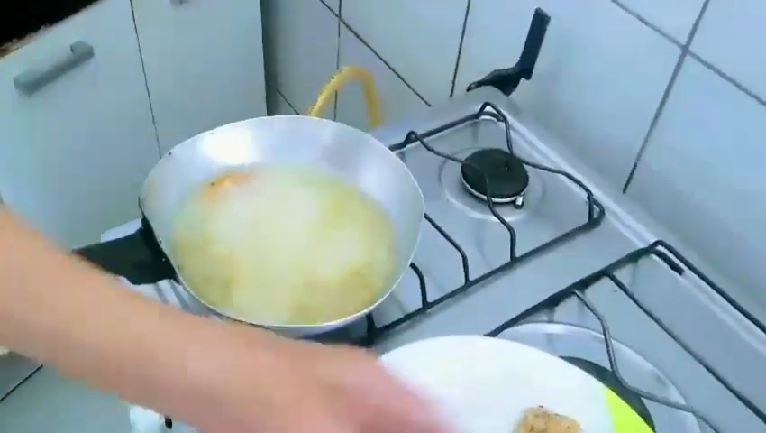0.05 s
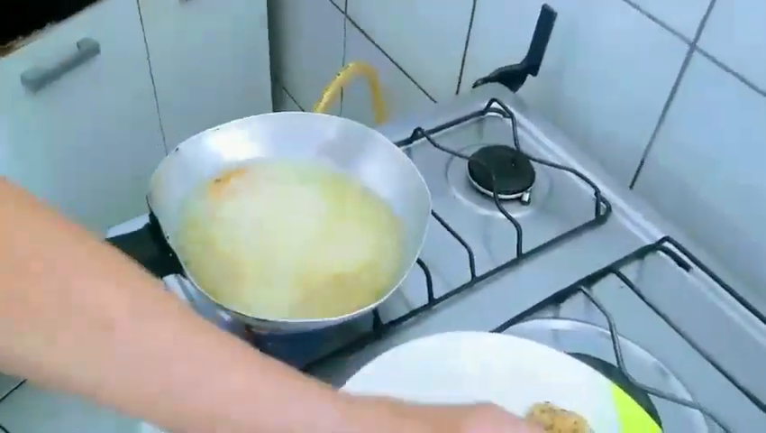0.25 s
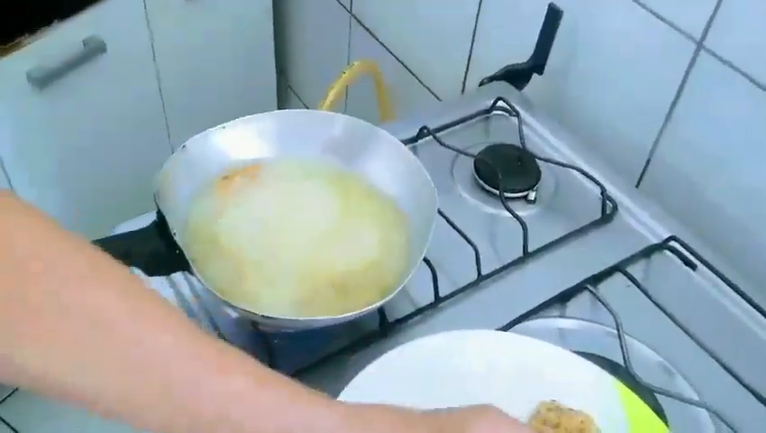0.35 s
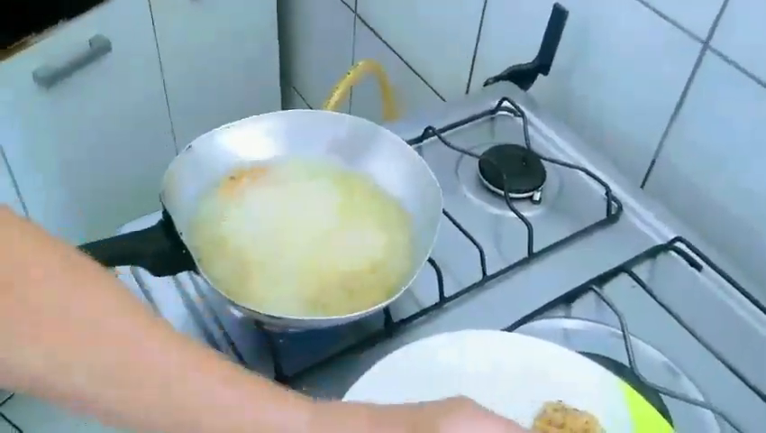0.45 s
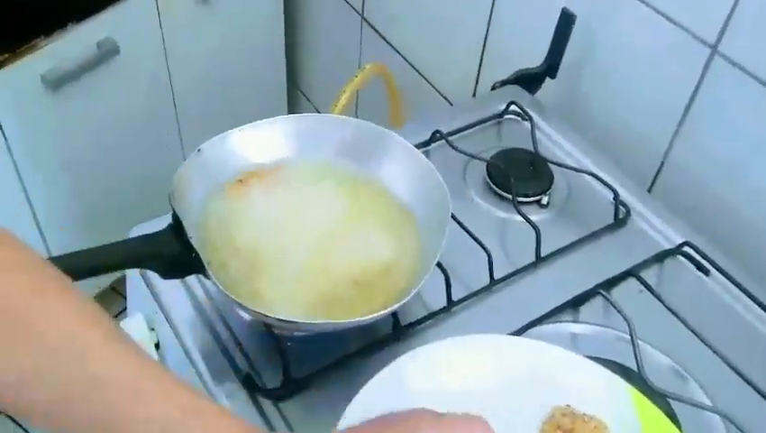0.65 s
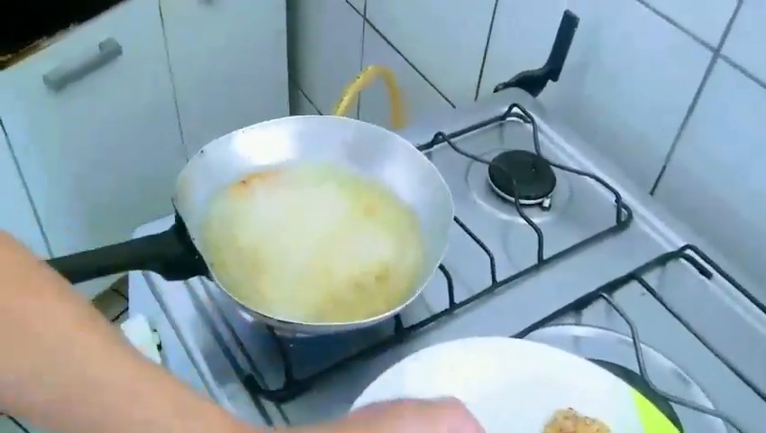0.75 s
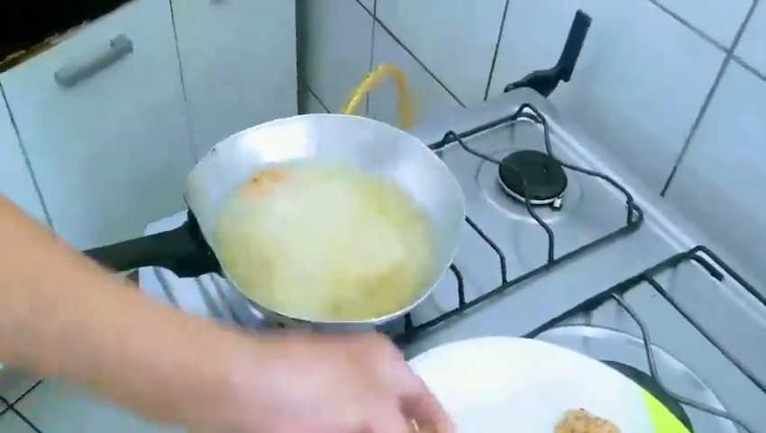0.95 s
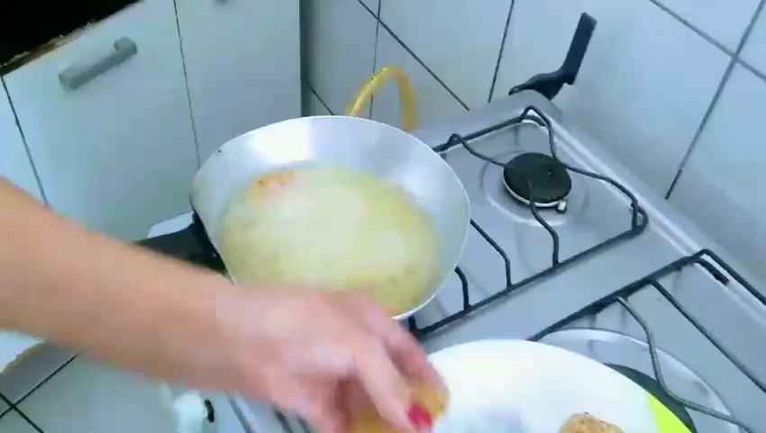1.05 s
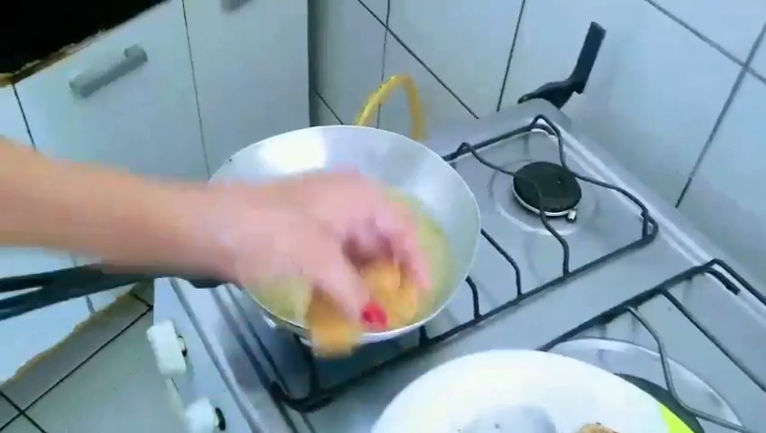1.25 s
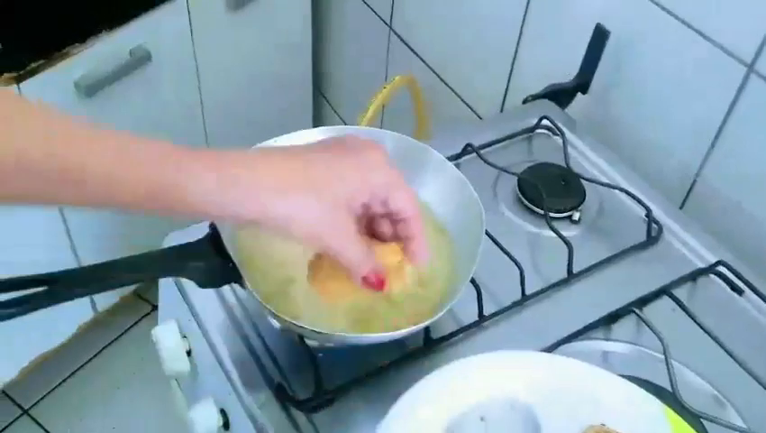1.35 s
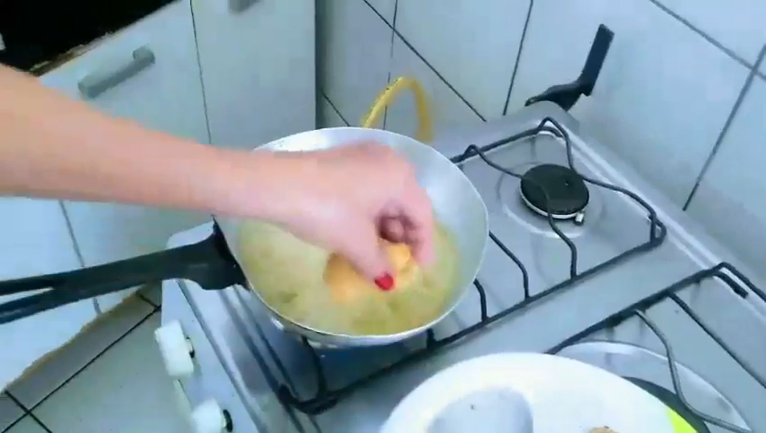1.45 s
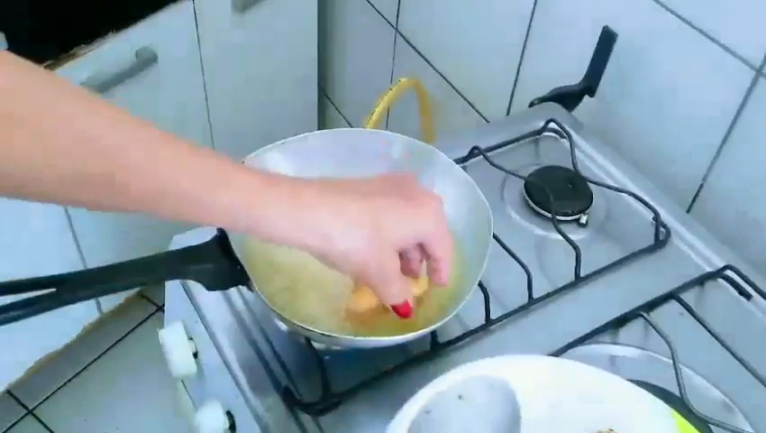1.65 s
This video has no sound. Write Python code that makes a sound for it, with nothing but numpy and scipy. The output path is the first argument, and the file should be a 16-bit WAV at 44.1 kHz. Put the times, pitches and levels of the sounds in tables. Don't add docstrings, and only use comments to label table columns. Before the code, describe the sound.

Food sizzling in hot oil in a thin pan, crackling and spitting, with two plate knocks

```python
import sys
import numpy as np
from scipy import signal
from scipy.fft import rfft, irfft, next_fast_len
from scipy.io import wavfile
from scipy.ndimage import uniform_filter1d

SR = 44100
rng = np.random.default_rng(int(sys.argv[2]) if len(sys.argv) > 2 else 0)


def master(y):
    cut = np.clip(np.atleast_2d(y).T, -1, 1)
    pcm = np.round(cut * 32767)
    wavfile.write(sys.argv[1], SR, pcm.astype(np.int16))


def field_ratio(decibels):
    return 10 ** (np.asarray(decibels, dtype=float) / 20)


N = 74970

# (time [s], level [dB])
VIGOUR = [
    (0.0, -40.5),
    (0.126, -39.5),
    (0.268, -40),
    (0.53, -41),
    (0.672, -44.5),
    (1.06, -43.5),
    (1.25, -50),
    (1.586, -49),
    (1.7, -57.5),
]
# (frequency [Hz], gain [dB])
BUBBLE_TONE = [(300, 0), (480, 0.5), (620, 0), (850, -7.5), (1200, -5), (1700, -1.5), (2800, -2),
               (4500, -14)]
# (frequency [Hz], gain [dB])
FIZZ_TONE = [(1500, -6), (3000, 0.5), (4000, 4), (6000, 2), (7000, 8), (10000, -0.5), (14500, -78),
             (16000, -42)]
# (frequency [Hz], gain [dB])
AIR_TONE = [(25, 26.5), (100, 3), (200, 1.5), (400, -4), (900, -7.5)]
# (time [s], level [dB])
PAN_LEVEL = [(0.0, -55), (0.088, -104), (0.118, -43), (0.178, -94), (0.226, -41.5), (0.382, -62),
             (0.496, -42), (0.554, -54.5), (0.762, -40), (0.912, -90), (0.95, -43.5), (1.51, -62.5),
             (1.552, -52), (1.7, -154)]
# (time [s], peak [dB], centre [Hz], width [share of centre])
POPS = [(0.006, -33, 6250, .3), (0.0190, -22.5, 7040, 0.59), (.0410, -20, 4200, 0.61),
        (.0662, -27, 6140, 0.49), (0.1024, -22.5, 6540, 0.84), (0.148, -29, 6450, 0.36),
        (0.186, -31, 6150, 0.56), (0.279, -25.5, 6540, 0.91), (0.285, -22, 3900, 0.17),
        (0.3, -30, 3400, 0.28), (0.319, -32.5, 6300, 0.61), (.3411, -26, 9000, 2.6),
        (0.354, -38, 6000, 0.19), (0.4349, -21.5, 3960, 0.27), (0.457, -29, 5600, 1.4),
        (0.466, -27, 5300, 0.35), (0.479, -26, 7500, 2.8), (0.495, -20, 6500, 0.13),
        (0.512, -28, 7400, 1.9), (.602, -28, 7040, 0.75), (.620, -29, 3900, 0.33),
        (0.677, -26.5, 4860, 0.94), (0.688, -26.5, 4800, 0.49), (0.702, -26.5, 7000, 0.64),
        (0.735, -27, 5000, 0.56), (0.805, -34.5, 6800, 0.31), (0.8447, -24.5, 4000, 0.31),
        (.866, -20, 3180, 0.35), (0.9292, -24, 5030, 1.), (0.965, -27, 9500, 0.21), (1.0347, -27, 6960, .8),
        (1.038, -28.5, 4460, 0.85), (1.1061, -28, 5400, 0.7), (1.134, -43, 6000, 0.62),
        (1.1561, -19, 6670, 0.5), (1.2265, -36, 6100, 1.6), (1.288, -34, 5770, 0.98),
        (1.302, -38, 7860, 0.42), (1.325, -38, 6500, 0.45), (1.4347, -38, 8300, .5),
        (1.4686, -39, 11600, 0.33), (1.5603, -38, 8450, 0.27), (1.572, -35, 9200, 0.24),
        (1.5805, -30.5, 8000, 0.34), (1.5896, -32.5, 7900, 0.42), (1.609, -53, 9000, 0.46),
        (1.650, -31, 8200, 0.76)]
# (time [s], peak [dB], pitch [Hz])
GULPS = [(0.044, -31.5, 1195), (.068, -35, 1130), (0.113, -30, 1074), (.162, -33, 1570), (0.432, -45, 650),
         (.678, -29.5, 647), (0.752, -36.5, 581), (0.853, -24, 1592), (0.865, -26, 1566),
         (0.927, -39.5, 970), (0.947, -32, 1180), (.962, -36.5, 380), (0.996, -29.5, 588),
         (1.068, -35, 641), (1.11, -29.5, 1645), (1.215, -30.5, 550), (1.233, -30, 565), (1.393, -56, 704),
         (1.459, -40, 644), (1.518, -32.5, 600), (1.548, -28, 620), (1.561, -30.5, 337),
         (1.588, -33.5, 604), (1.607, -38, 609), (1.653, -46, 945)]
# (time [s], peak [dB], thump [Hz], crack [Hz], crack level [dB])
KNOCKS = [
    (0.2032, -14.5, 860, 4860, -7),
    (0.5573, -25, 1190, 2220, -5.5),
]
# (frequency [Hz], level [dB], T60 [s])
FIRST_RING = [(800, -12, 0.14), (907, -5, 0.051), (1522, -26, 0.56), (1857, -4.5, 0.075), (2105, -7, 0.085),
              (2720, -21, 0.16), (2970, -27, 0.26), (2906, -12.5, 0.12), (3373, -19.5, 0.23),
              (4000, -21, 0.11), (5030, -22, 0.092), (6060, -14, 0.17), (6180, -0.5, 0.039),
              (8720, -12, 0.07)]
# (frequency [Hz], level [dB], T60 [s])
SECOND_RING = [(623, -28, 0.52), (1082.5, -6, 0.27), (1180, -10, 0.057), (1782, -5, 0.26),
               (2670, -3.5, 0.026), (2905, -15, 0.25), (3530, -17, 0.34), (3770, -34, 0.056),
               (5600, -22, 0.12)]
# (frequency [Hz], level [dB], swell [s], T60 [s])
SETTLING = [(507.9, -18.5, 0.056, 0.03), (1075, -22, 0.036, 0.12), (252, -29.5, 0.0332, 0.021),
            (610, -47, 0.012, 0.23), (740, -40.5, 0.18, 0.16), (520, -33, 0.15, 0.073),
            (708.4, -36.5, 0.039, 0.2), (69, -35, .01, 0.22), (386.5, -42.5, 0.176, 0.18),
            (1097.6, -30.5, .38, 0.085)]
# (frequency [Hz], T60 [s])
KITCHEN_T60 = [(250, 0.25), (1000, 0.36), (4000, 0.54), (12000, 0.25)]
# (frequency [Hz], gain [dB])
RIGHT_TONE = [(100, -5), (500, 0), (1700, -20.5), (2600, 7), (4500, 4), (8000, 3.5), (14000, -12.5)]
# (frequency [Hz], gain [dB])
MIC_TONE = [(30, -30), (170, -3), (260, 1), (13000, -3), (14800, -6), (15600, -16), (16200, -52)]
# (frequency [Hz], share [0-1])
WIDEN_SHARE = [(100, 0.37), (500, 0.56), (1100, 0.79), (2200, 0.56), (3500, 0.18), (5700, 0.49),
               (8000, 0.14), (15000, 0.033)]


def read(points, hz):
    f, value = np.transpose(points)
    return np.interp(np.log(hz + 1), np.log(f + 1), value)


def curve(points):
    return np.interp(np.arange(N) / SR, *np.transpose(points))


def evened(x):
    return x / np.sqrt(np.mean(x ** 2) + 1e-20)


def coloured(x, gain):
    size = next_fast_len(N + 4096)
    spectrum = rfft(x, size) * gain(np.fft.rfftfreq(size, 1 / SR))
    return irfft(spectrum, size)[..., :N]


def add(mix, s, sound):
    part = mix[max(round(s * SR), 0):][:len(sound)]
    part += sound[:len(part)]


def resonate(x, hz, width_hz):
    turn = np.exp(2j * np.pi * hz * np.arange(len(x)) / SR)
    r = np.exp(-np.pi * width_hz / SR)
    return 2 * (turn * signal.lfilter([1 - r], [1, -r], x / turn)).real


def peaked(x, hz, width_hz):
    return evened(resonate(resonate(x, hz, width_hz), hz, width_hz))


def noise_peak(t, hz, width_hz):
    return peaked(rng.standard_normal(len(t)), hz, width_hz)


def grains(lo_hz, hi_hz, per_s, spread_db, turns, count=24):
    size = field_ratio(spread_db * np.minimum(rng.exponential(1, (2, N)), 4))
    size = size * (rng.random((2, N)) < per_s / SR)
    kind = rng.integers(0, count, (2, N))
    out = np.zeros((2, N))
    for k, hz in enumerate(np.geomspace(lo_hz, hi_hz, count)):
        u = np.arange(int(32 * SR / hz)) * hz / SR
        shape = np.sqrt(hz) * (1 - np.exp(-u / 0.14)) * np.exp(-u / turns * 2)
        blip = shape * np.sin(2 * np.pi * u * (1 + 0.02945 * u))
        out += signal.oaconvolve(size * (kind == k), blip[None], axes=1)[:, :N]
    return out


def oil():
    vigour_db = curve(VIGOUR)
    vigour_db = vigour_db - np.mean(vigour_db)
    bubbles = grains(517.6, 3970, per_s=2500, spread_db=5, turns=15)
    bubbles = coloured(bubbles, lambda f: field_ratio(read(BUBBLE_TONE, f)))
    fizz = grains(1750, 9570, per_s=14000, spread_db=5.5, turns=8.4)
    fizz = coloured(fizz, lambda f: field_ratio(read(FIZZ_TONE, f)))
    crackle = grains(5500, 15600, per_s=1300, spread_db=4, turns=2.4, count=10)

    size = round(0.014 * SR)
    clumps = evened(uniform_filter1d(uniform_filter1d(rng.standard_normal(N), size), size))
    clumping = field_ratio(2.5 * clumps)
    bubbles = evened(bubbles * clumping) * field_ratio(-40 + 0.53 * vigour_db)
    fizz = evened(fizz * clumping) * field_ratio(-46.5 + vigour_db)
    crackle = evened(crackle) * field_ratio(-59.5 + 2.7 * vigour_db)
    return bubbles + fizz + crackle


def room_air():
    noise = rng.standard_normal((2, N))
    return field_ratio(-47) * evened(coloured(noise, lambda f: field_ratio(read(AIR_TONE, f))))


def pan():
    return peaked(rng.standard_normal(N), hz=241, width_hz=70) * field_ratio(curve(PAN_LEVEL) - 7.5)


def pops():
    out, t = np.zeros(N), np.arange(2000) / SR
    rise_s, pop_s, spray_s = 0.0004, 0.0013, 0.0082
    fall = np.exp(-t / pop_s) + field_ratio(-13) * np.exp(-t / spray_s)
    shape = np.minimum(t / rise_s, 1) * fall
    for s, db, hz, wide in POPS:
        noise = rng.standard_normal(len(t))
        burst = peaked(noise, hz, np.clip(wide, 0.05, 2) * hz)
        snap = field_ratio(-10) * evened(resonate(noise[::-1], 7400, 3100))
        add(out, s, field_ratio(db - 1) * shape * (burst + snap))
    return out


def gulps():
    out, t = np.zeros(N), np.arange(2000) / SR
    rise_s, decay_s, late_s = 0.0011, 0.0067, 0.002
    shape = np.sin(np.pi / 2 * np.minimum(t / rise_s, 1)) ** 2 * np.exp(-t / decay_s)
    for s, db, hz in GULPS:
        slap = field_ratio(-1) * noise_peak(t, 1440, 1420)
        tone = np.sin(2 * np.pi * hz * t)
        add(out, s + late_s, field_ratio(db + 1) * shape * (tone + slap))
    return out


def note(hz, t, rattle=0.9):
    return np.sin(2 * np.pi * hz * t) + rattle * noise_peak(t, hz, 70 + hz / 20)


def knocks():
    out, t = np.zeros(N), np.arange(SR // 2) / SR
    for (s, db, thump_hz, crack_hz, crack_db), modes in zip(KNOCKS, (FIRST_RING, SECOND_RING)):
        ring = sum(field_ratio(d - 60 * t / min(t60, 0.3)) * note(hz, t) for hz, d, t60 in modes)
        crack = field_ratio(crack_db - 60 * t / 0.12) * noise_peak(t, crack_hz, 3.8 * crack_hz ** 2 / 5000)
        body = field_ratio(-14 - 60 * t / 0.62) * noise_peak(t, 0.54 * thump_hz, 540)
        thump = field_ratio(-4 - 60 * t / 0.026) * np.sin(2 * np.pi * thump_hz * t)
        attack = np.minimum(t / 0.00036, 1)
        add(out, s, field_ratio(db) * attack * (ring + crack + body + thump))
    return out


def settling():
    out, t = np.zeros(N), np.arange(SR // 2) / SR
    first_s = KNOCKS[0][0]
    add(out, first_s, field_ratio(-32 - 60 * t / 0.15) * noise_peak(t, 11000, 6000))
    for hz, db, swell_s, t60 in SETTLING:
        swell = np.clip(1 - (swell_s - t) / 0.078, 0, 1) * np.minimum(t / swell_s, 1)
        decay = field_ratio(db - 60 * np.maximum(t - swell_s, 0) / t60)
        add(out, first_s, swell * decay * note(hz, t, rattle=0.4))
    return out


def kitchen(x):
    taps = np.zeros((2, SR // 2))
    at = np.arange(100, SR // 2 - 20, 20)
    at = at + rng.integers(0, 20, (2, len(at)))
    np.put_along_axis(taps, at, rng.choice([-1., 1.], at.shape), 1)
    hz, t, z = signal.stft(taps, SR, nperseg=256)
    decay = field_ratio(-60 * t / read(KITCHEN_T60, hz)[:, None])
    tail = signal.istft(z * decay, SR, nperseg=256)[1]
    tail = tail / np.linalg.norm(tail[0])
    return signal.fftconvolve(x * np.ones((2, 1)), tail, axes=1)[:, :N]


def heard(x, wet_db, lag_s):
    right = coloured(x, lambda f: field_ratio(read(RIGHT_TONE, f)) * np.exp(-2j * np.pi * f * lag_s))
    return np.array([x, right]) + field_ratio(wet_db) * kitchen(x)


def scene():
    fry = oil()
    apart = coloured(fry[::-1], lambda f: 0.96 * f / (f + 400))
    air = room_air()
    stove = heard(0.56 * fry[0] + pan(), wet_db=2, lag_s=0.00021)
    spits = heard(pops() + gulps(), wet_db=-9, lag_s=0.00018)
    plate = heard(knocks() + settling(), wet_db=-6, lag_s=0.00004)
    return stove + apart + air + spits + plate


def roll_off(x):
    return signal.sosfilt(signal.butter(12, 16090, fs=SR, output="sos"), x)


def record(dry):
    x = coloured(dry, lambda f: field_ratio(read(MIC_TONE, f)))
    delay_s = 0.000453
    other = coloured(x[::-1], lambda f: np.clip(read(WIDEN_SHARE, f), 0, 1) * np.exp(-2j * np.pi * f * delay_s))
    mix = 0.69 * (x - other)
    return roll_off(mix)


dry = scene()
out = record(dry)
master(out)
```